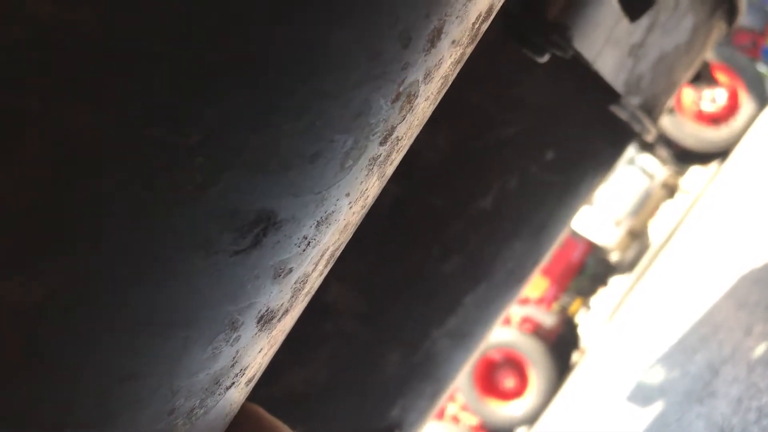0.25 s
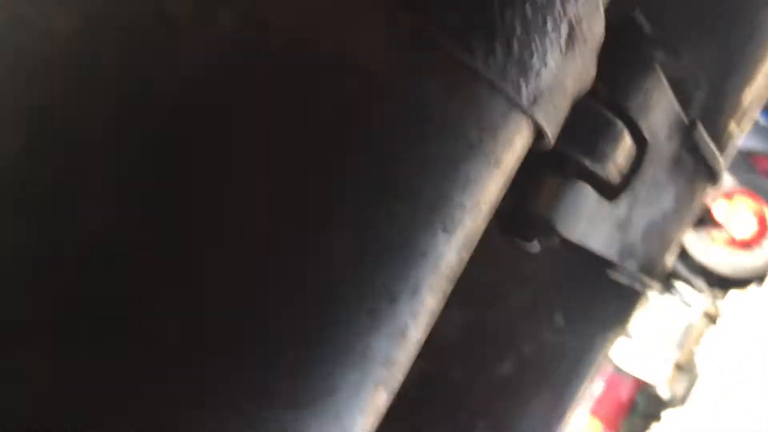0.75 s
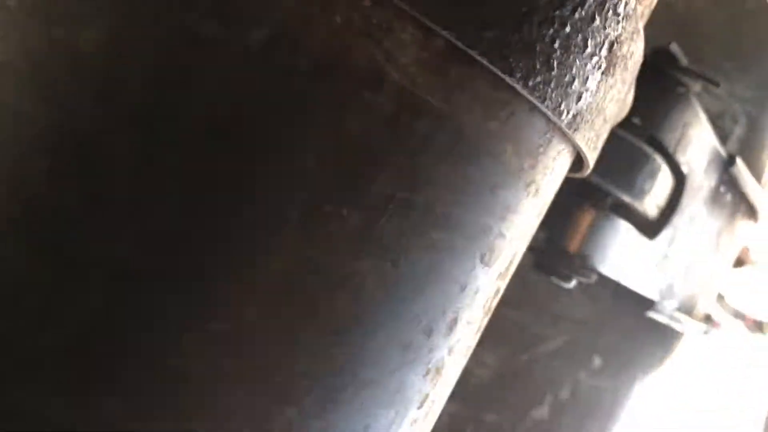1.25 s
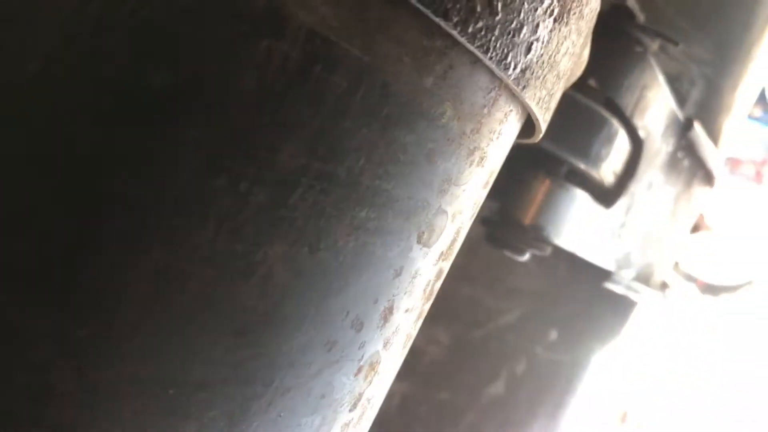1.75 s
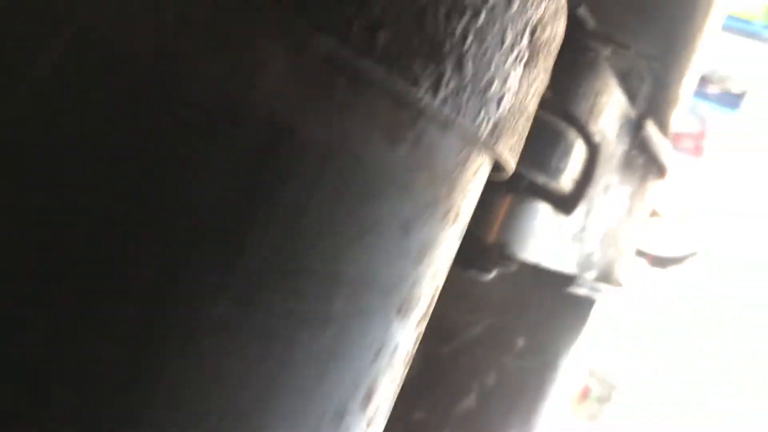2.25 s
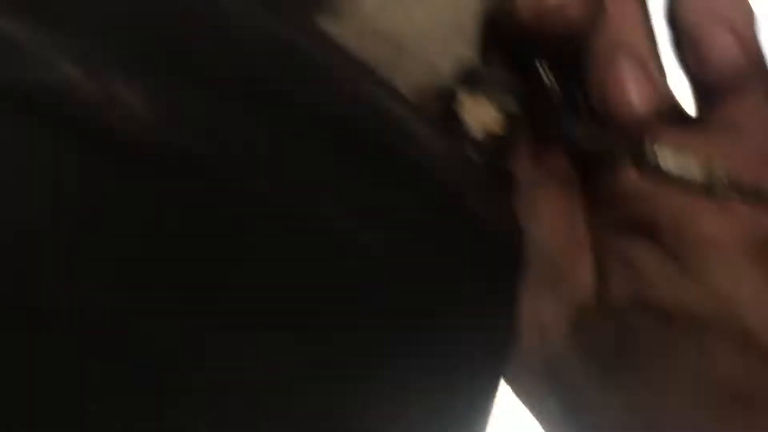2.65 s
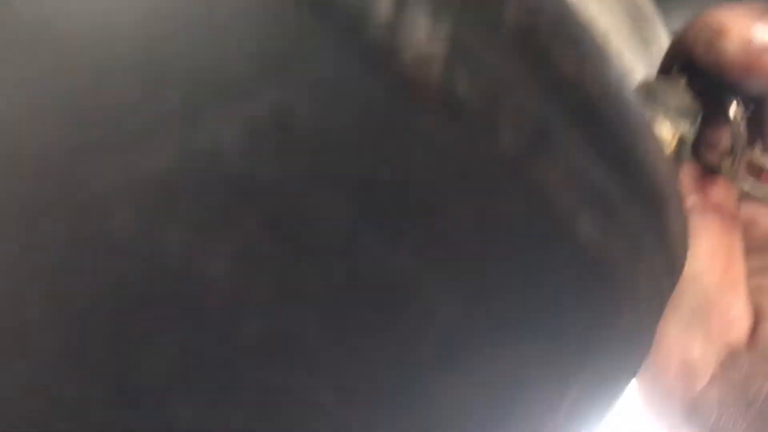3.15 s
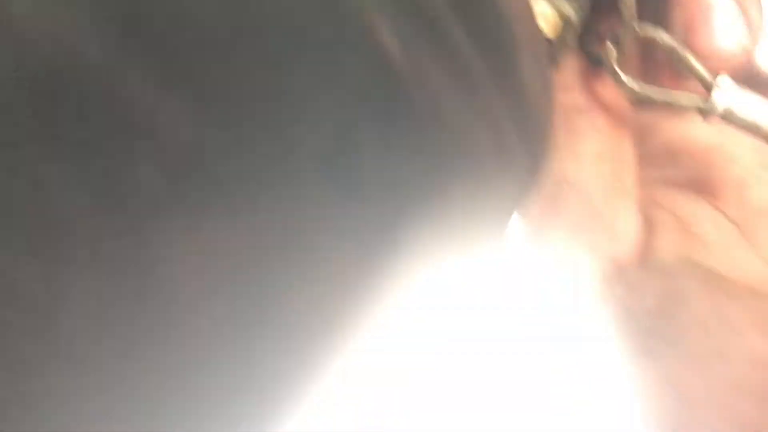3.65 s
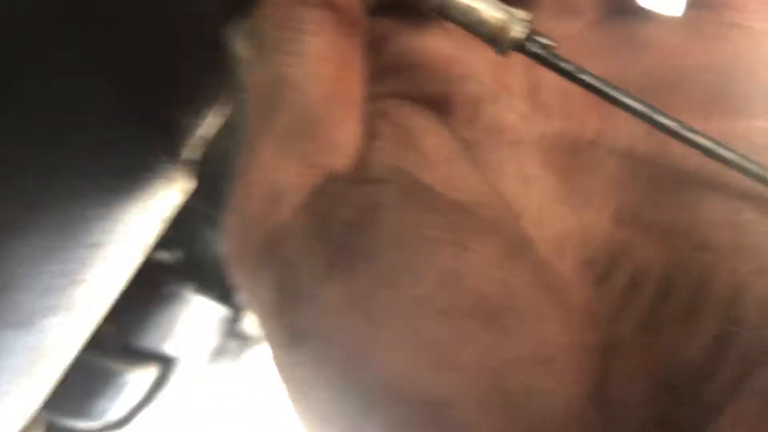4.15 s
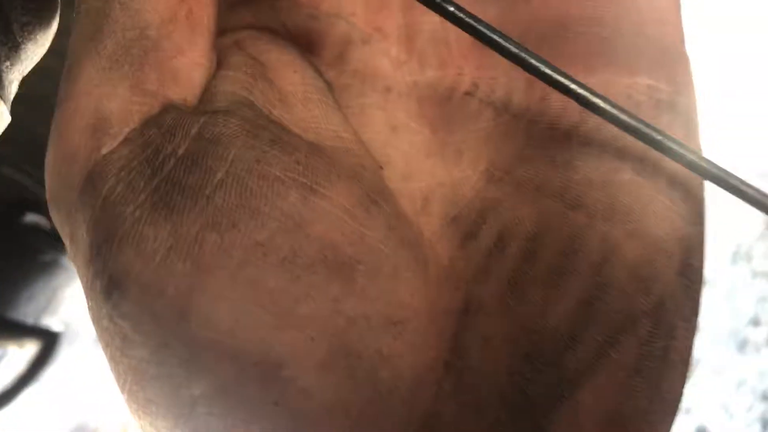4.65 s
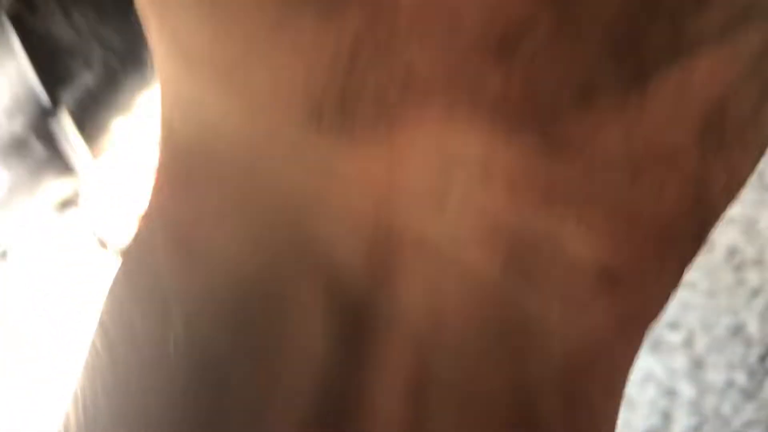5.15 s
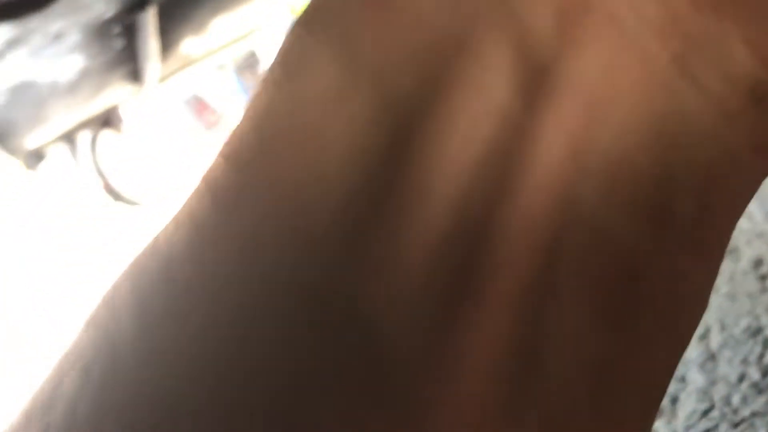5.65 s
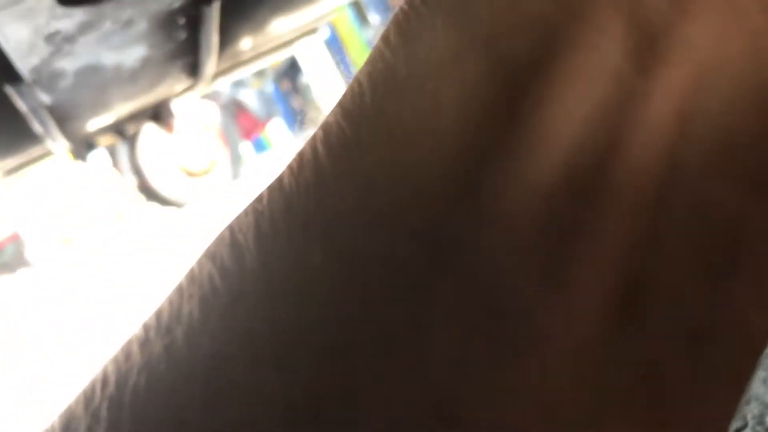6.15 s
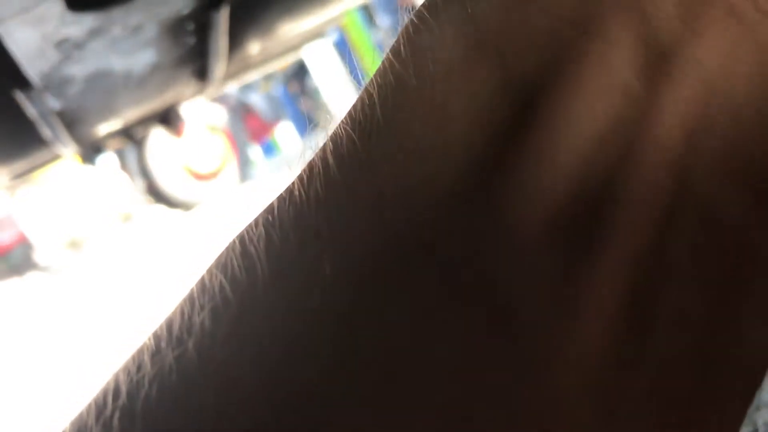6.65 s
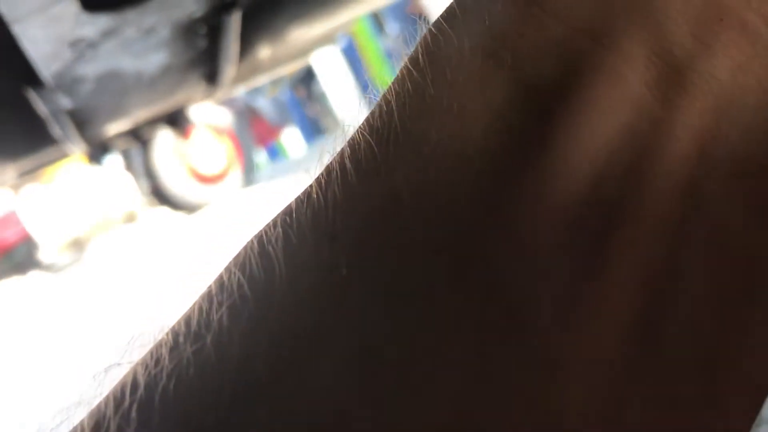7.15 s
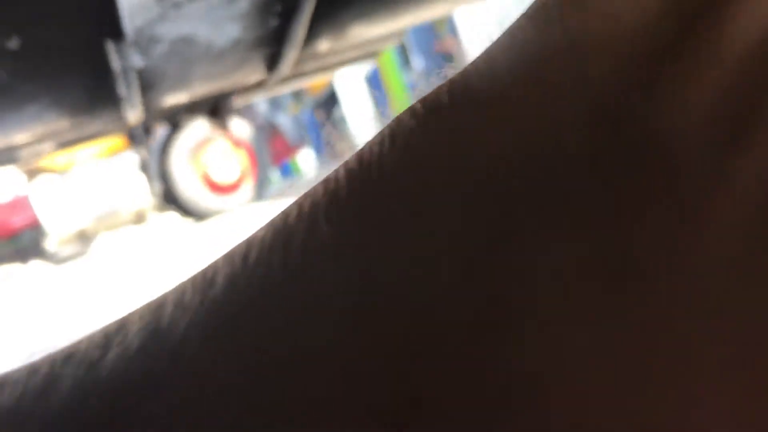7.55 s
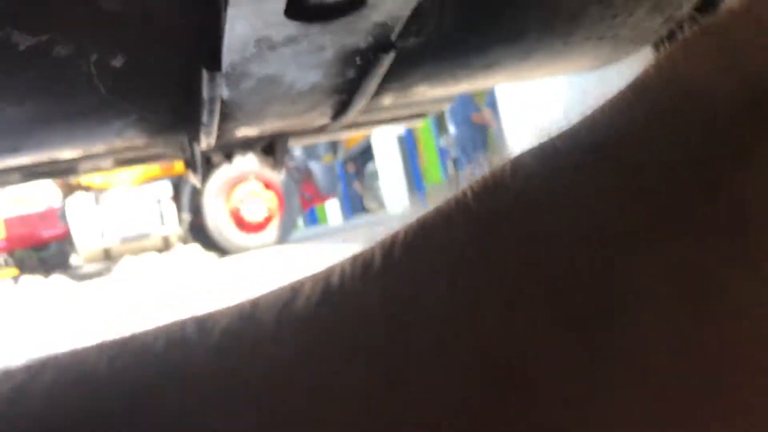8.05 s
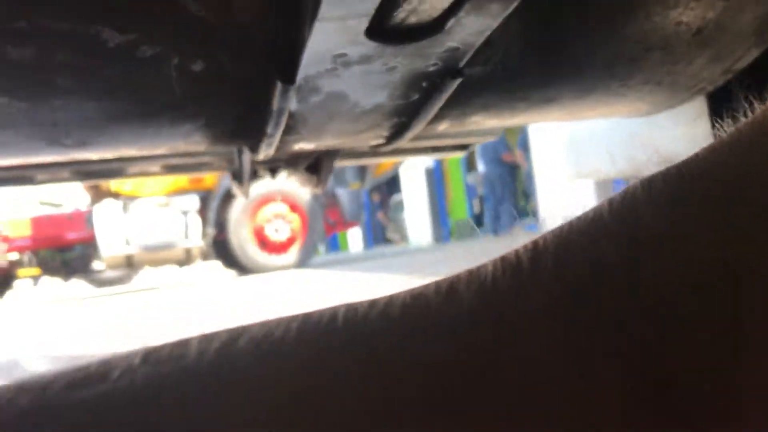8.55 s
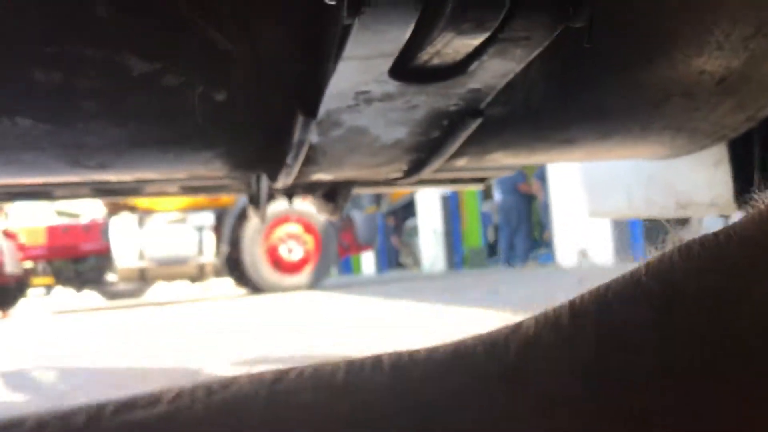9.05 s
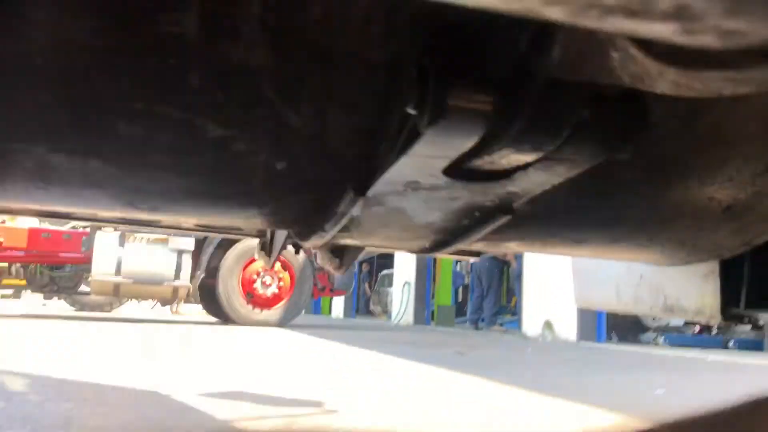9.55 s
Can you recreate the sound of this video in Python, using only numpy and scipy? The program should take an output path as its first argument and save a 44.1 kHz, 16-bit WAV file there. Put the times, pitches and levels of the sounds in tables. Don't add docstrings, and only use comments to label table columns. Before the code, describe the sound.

A truck air tank's drain valve blasts a bright steady hiss, pauses over a faint idling hum, hisses long again, then snaps shut.

```python
import sys
import numpy as np
from scipy import signal
from scipy.fft import rfft, irfft, next_fast_len
from scipy.io import wavfile
from scipy.ndimage import uniform_filter1d, map_coordinates

SR = 44100
rng = np.random.default_rng(int(sys.argv[2]) if len(sys.argv) > 2 else 0)


def wav_record(signal):
    frames = np.transpose(np.atleast_2d(signal))
    bounded = np.clip(frames, -1, 1)
    quanta = np.round(bounded * 32767).astype(np.int16)
    wavfile.write(sys.argv[1], SR, quanta)


def volts_from_db(level):
    exponent = np.asarray(level, float) / 20
    return 10 ** exponent


N = 431722

TOP_HZ = 15750


def unit(x):
    return x / np.sqrt(np.mean(x ** 2) + 1e-20)


def along(points, hz):
    f, v = np.transpose(points)
    return np.interp(np.log(hz + 1), np.log(f + 1), v)


def curve(rows, t=None, shut=None):
    s, *cols = np.transpose(rows)
    t = np.arange(N) / SR if t is None else t
    return [np.interp(t, s, c, shut, shut) for c in cols]


def wobble(rate):
    steps = np.arange(0, N + 32, 32)
    knots = rng.standard_normal(int(N * rate / SR) + 4)
    smooth = map_coordinates(knots, [steps * rate / SR])
    return np.interp(np.arange(N), steps, smooth)


def noise(shape):
    hz, t, z = signal.stft(rng.standard_normal(N), SR, nperseg=1024, noverlap=768)
    return unit(signal.istft(z * shape(hz[:, None], t), SR, nperseg=1024, noverlap=768)[1][:N])


def streaks(hz, t, bins, frames):
    field = rng.standard_normal((len(hz), len(t)))
    field = uniform_filter1d(field, size=bins, axis=0)
    return unit(uniform_filter1d(field, size=frames, axis=1))


# frequency in Hz, spectrum level in dB per Hz.
JET_SPECTRUM = [(350, -28.5), (1000, -17), (1400, -14), (2000, -8.5), (3200, -10), (4600, -9), (6000, -8.5),
                (7400, -9), (9000, -3), (9900, -3), (10500, -8), (11200, -6), (13000, -1.1147), (15600, -1)]
# time in seconds, jet level in dB, tilt from bass to treble in dB, mid bulge in dB.
CORD_PULL = [(0, -21.5, -0.5, -2), (.38, -23, -3, -3), (1.9, -21, -2, -2.5), (2.05, -20.5, -0.5, -1.5),
             (2.15, -23, -0.5, -3.5), (2.67, -21, 1, -2.5), (2.92, -23, -0.5, 9.5), (3.07, -23, 0.5, -1),
             (3.38, -24.5, 0.5, -0.5), (3.63, -21.5, -.5, -1), (4.04, -26.5, -2.5, 4), (4.12, -23, -1, 3.5),
             (5.07, -22, -1.5, 0), (5.5, -21, 2, -1.5), (6.2, -21, 1.6, -3.5), (7.4, -22, 1.5, -2.5),
             (8.4, -23, 1.46, 3.5), (9.55, -21.5, -0.5, -0.5)]
SPIT_DB, BLAST_SPIT_DB = .7, 1.1
THROAT_DB, FIRST_THROAT_DB = -0.06, -3
BLAST_DB, BLAST_THROAT_DB = 1.5, 1.5


def jet(patchy_db=1.1):
    def shape(hz, t):
        _, tilt_db, bulge_db = curve(CORD_PULL, t)
        place = np.clip(hz / 8000 - 1, -1, 1)
        colour_db = along(JET_SPECTRUM, hz) + tilt_db * place + bulge_db * (1 - place ** 2)
        patches_db = patchy_db * (1 + np.exp(-(hz / 5000) ** 2)) * streaks(hz, t, 3, 90)
        gain = volts_from_db(colour_db + patches_db)
        wide_rush = blast(t / 2 + BLAST_S / 2)
        second_db = THROAT_DB + BLAST_THROAT_DB * wide_rush
        throat_db = np.where(t < CRACK_STEPS[0][0], FIRST_THROAT_DB, second_db)
        gain = gain * volts_from_db(throat_db * np.exp(-np.log((hz + 1) / 1800) ** 2 / 0.21))
        gain = gain * (hz < TOP_HZ) * reflections(hz, t)
        return gain / np.sqrt(np.mean(abs(gain) ** 2, axis=0))
    rush = blast(np.arange(N) / SR)
    spit_db = (SPIT_DB + BLAST_SPIT_DB * rush) * wobble(300)
    level_db = curve(CORD_PULL)[0] + BLAST_DB * rush + 0.473 * wobble(15) + spit_db
    return valve() * volts_from_db(level_db) * noise(shape)


# start of the fall in seconds, time to lose 10 dB in seconds, steepening power.
VALVE_SHUTS = [
    (.374, .063, 3.3),
    (9.553, .006, .62),
]
# time in seconds, level relative to the full jet in dB.
CRACK_STEPS = [
    (1.786, -39),
    (1.79, -23),
    (1.812, -4.5),
    (1.83, -9.5),
    (1.846, -9),
    (1.876, 0),
]


def valve():
    t = np.arange(N) / SR
    first_db, last_db = (-10 * (np.clip(t - s, 0, 1) / fall_s) ** power for s, fall_s, power in VALVE_SHUTS)
    second_db = np.where(t < CRACK_STEPS[0][0], -200, curve(CRACK_STEPS)[0]) + last_db
    return volts_from_db(np.maximum(first_db, second_db))


BLAST_S, BLAST_WIDTH_S = 2.02, .07


def blast(t):
    return np.exp(-((t - BLAST_S) / BLAST_WIDTH_S) ** 2)


# time in seconds, extra path in mm, reflected share.
GROUND_ECHO = [(4.55, 381, .08), (4.85, 382, .19), (5.05, 372, .15), (5.25, 348, .14), (5.65, 328, .27),
               (5.95, 318, .23), (6.25, 314, .27), (7.35, 313, .22), (7.55, 296, .2), (7.75, 285, .23),
               (8.35, 276, .32), (8.55, 264, .22), (8.8, 259, .08), (9.5, 265, .13)]
# start and end in seconds, path as a ratio of the ground path, share (negative is inverted).
GROUND_FOLLOWERS = [(4.7, 6.4, 1.09, -.11), (5.4, 5.75, .655, .13), (5.95, 7.5, .615, .17),
                    (5.95, 7.35, .84, -.12), (6.05, 7.45, .805, .13), (7.55, 7.8, .86, .15),
                    (6.35, 7.15, 1.25, .09), (5.25, 5.75, .535, -.18), (5.9, 7.4, .5, -.1),
                    (6, 7.4, 1.15, -.08), (5.6, 7.4, 1.94, .07), (6.6, 7.4, 1.85, -.08),
                    (6.85, 7.4, .72, -.08), (7.75, 8.45, 1.45, -.13), (7.9, 8.15, .86, -.1),
                    (7.9, 8.15, .66, -.12), (7.95, 8.45, 1.92, .1), (8.65, 9.1, 2.07, .08),
                    (8.65, 9.5, 1.58, -.09)]
# start and end in seconds, extra path at start and at end in mm, share.
ARM_AND_TANK = [(0, .4, 34, 36, -.37), (0, .4, 93, 97, .17), (0, .4, 70, 71, -.2), (1.85, 2.6, 59, 57, .24),
                (1.85, 2.45, 76, 76, -.21), (2.45, 2.65, 50, 48, -.21), (2.75, 2.95, 70, 74, -.18),
                (2.9, 3.95, 33, 40, -.22), (2.95, 3.45, 127, 131, -.22), (2.75, 3.45, 294, 299, .08),
                (3.05, 3.75, 90, 86, .17), (3.65, 4.15, 106, 82, -.21), (4.25, 5.1, 79, 73, -.24),
                (3.75, 4.25, 69, 63, .18), (4.35, 5.1, 61, 53, .34), (4.25, 5.05, 119, 112, .11),
                (4.7, 5.05, 29, 31, -.16), (5.25, 7.45, 43, 41, .11), (5.8, 7.75, 126, 128, .2),
                (7.75, 8.45, 61, 61, -.17), (7.85, 8.35, 110, 106, -.22), (0, .4, 125, 125, -.1),
                (8.45, 9.1, 136, 143, -.06), (8.9, 9.45, 46, 43, .2)]
# start and end in seconds, extra path at start and at end in mm, share.
FRAME_AND_AXLE = [(0, .4, 483, 488, -.12), (0, .4, 189, 189, .22), (1.85, 2.35, 192, 165, .16),
                  (2.8, 3.45, 532, 522, -.1), (1.95, 2.95, 419, 426, .09), (2.75, 3.05, 161, 160, -.22),
                  (2.65, 3.35, 250, 248, .15), (3.45, 4.05, 262, 255, .11), (3.3, 4.65, 244, 237, .12),
                  (3.05, 3.45, 218, 211, -.12), (3.65, 4.45, 435, 395, .1), (1.87, 2.15, 341, 341, .11),
                  (4.25, 5.05, 304, 291, .1), (4.45, 5.25, 214, 207, -.11), (7.85, 8.55, 170, 166, -.29),
                  (8.75, 9.5, 183, 183, -.21), (7.95, 9.5, 208, 203, -.17), (8.3, 9.5, 735, 722, -.08),
                  (8.35, 8.55, 334, 326, .15), (8.55, 9.5, 582, 585, -.14), (8.65, 9.25, 360, 349, -.09),
                  (8.65, 9.45, 388, 396, -.09), (8.65, 9.45, 702, 704, -.09), (8.6, 9.5, 457, 457, .08)]


def reflections(hz, t):
    count, t = len(t), t[1::3]
    total = np.ones((len(hz), len(t)), complex)
    dull = 1.22 * np.exp(-(hz / 14000) ** 2 / 2)
    ground_mm, ground_share = curve(GROUND_ECHO, t)
    echoes = [(GROUND_ECHO[0][0], GROUND_ECHO[-1][0], ground_mm, ground_share)]
    for start, end, ratio, share in GROUND_FOLLOWERS:
        echoes.append((start, end, ratio * ground_mm, share + 0 * t))
    for start, end, first_mm, last_mm, share in ARM_AND_TANK + FRAME_AND_AXLE:
        path_mm = np.interp(t, [start, end], [first_mm, last_mm])
        echoes.append((start, end, path_mm, share + 0 * t))
    for start, end, path_mm, share in echoes:
        seen = np.clip(np.minimum(t - start, end - t) / .14 + 1, 0, 1)
        on = seen > 0
        delay = path_mm[on] / 343e3
        total[:, on] += share[on] * seen[on] * dull * np.exp(-2j * np.pi * hz * delay)
    return total[:, np.minimum(np.arange(count) // 3, len(t) - 1)]


# frequency in Hz, time to decay by 60 dB in seconds.
UNDERSIDE_DECAY = [(1000, 0.23), (5000, 0.23), (15000, 0.084)]


def underside(x):
    hz, t, z = signal.stft(rng.standard_normal(SR // 3), SR, nperseg=256)
    decay = volts_from_db(-60 * t / along(UNDERSIDE_DECAY, hz)[:, None])
    tail = signal.istft(z * decay, SR, nperseg=256)[1]
    return signal.fftconvolve(x, tail / np.linalg.norm(tail))[:N]


# time in seconds, level in dB.
SEEP_LEVEL = [
    (1.48, -92.5),
    (1.53, -72.5),
    (1.65, -69.5),
    (1.79, -68),
    (1.82, -90),
]


def seep():
    def two_bands(hz, t):
        lower = 1 / (1 + ((hz - 14300) / 400) ** 4)
        upper = .6 / (1 + ((hz - 15400) / 300) ** 4)
        return lower + upper
    return volts_from_db(curve(SEEP_LEVEL, shut=-200)[0] + 3 * wobble(25)) * noise(two_bands)


# time in seconds, peak in dB, colour in Hz, time to decay by 60 dB in seconds.
VALVE_TICKS = [
    (1.304, -36, 5430, 0.064),
    (1.304, -35.5, 1800, 0.099),
    (1.446, -62.5, 12000, .01),
]
# time in seconds, peak in dB, frequency in Hz, length in cycles.
FINGER_BUMPS = [
    (1.479, -20.5, 185, 2),
    (3.63, -36, 110, 2),
    (.785, -28, 90, 1.5),
]


def handling():
    out, t = np.zeros(N + SR), np.arange(SR // 5) / SR
    hz = np.fft.rfftfreq(len(t), 1 / SR)
    for s, db, colour_hz, t60 in VALVE_TICKS:
        resonance = 1 / (1 + ((hz - colour_hz) / 1500) ** 2)
        burst = unit(irfft(rfft(rng.standard_normal(len(t))) * resonance, len(t)))
        crack = 0.45 * volts_from_db(-60 * t / 0.0037) * rng.standard_normal(len(t))
        out[round(s * SR):][:len(t)] += volts_from_db(db) * (volts_from_db(-60 * t / t60) * burst + crack)
    for s, db, push_hz, cycles in FINGER_BUMPS:
        life = np.clip(t * push_hz / cycles, 0, 1)
        out[round(s * SR):][:len(t)] += volts_from_db(db) * np.sin(np.pi * life) * np.sin(2 * np.pi * push_hz * t)
    return out[:N]


# time in seconds, level in dB.
YARD_LEVEL = [(0, -44.5), (2.2, -45), (2.75, -49), (3.5, -47), (7.7, -46.5), (9, -42.5), (9.79, -42)]
# frequency in Hz, spectrum level in dB per Hz.
RUMBLE_SPECTRUM = [(30, -34.5), (45, -3.5), (120, -14), (230, -13), (400, -13.5), (480, -18.5),
                   (1500, -27.5), (2100, -33), (3800, -39.5), (5000, -49.5), (7500, -54.5), (10500, -57),
                   (12000, -55.5), (15700, -52)]
# multiple of the firing rate, level in dB.
ENGINE_ORDERS = [(1, -6), (2, -4), (3, 0), (4, 2), (5, -7.5), (6, -11.5), (7, -6.5), (8, -9.5), (9, -23.5),
                 (10, -26)]
FIRING_HZ = 49.45


def yard(tone_db=-3, rumble_db=-2):
    turns = np.cumsum(FIRING_HZ + 0.09813 * wobble(2)) / SR
    tones = np.zeros(N)
    for k, db in ENGINE_ORDERS:
        tones += volts_from_db(db + 1.5 * wobble(6)) * np.sin(2 * np.pi * (k * turns + k * k / 4))

    def rumble_shape(hz, t):
        mottle_db = np.clip(hz / 4000, .6, 1.8) * streaks(hz, t, 16, 20)
        return volts_from_db(along(RUMBLE_SPECTRUM, hz) + mottle_db)
    rumble = volts_from_db(rumble_db + .8 * wobble(9)) * noise(rumble_shape)
    return volts_from_db(curve(YARD_LEVEL)[0] + gain_lift_db()) * (volts_from_db(tone_db) * unit(tones) + rumble)


# start in seconds, time the jet pulls it down in seconds, lift in dB.
GAIN_RELEASES = [
    (.4, 1.847, 10),
    (9.67, 10, 14),
]
GAIN_RISE_S, GAIN_FALL_S = .2, .27


def gain_lift_db():
    t = np.arange(N) / SR
    lift_db = np.zeros(N)
    for up, down, db in GAIN_RELEASES:
        rise, fall = (t - up) / GAIN_RISE_S, 1 - (t - down) / GAIN_FALL_S
        lift_db += db * np.clip(np.minimum(rise, fall), 0, 1)
    return lift_db


# start in seconds, lower and upper edge in Hz.
SIDE_BANDS = [(0.276, 5000, 9400), (2.343, 9000, 10200), (2.411, 6700, 14100), (2.947, 7600, 8900),
              (3.461, 4800, 6200), (4.017, 5700, 12400), (4.386, 4400, 10900), (4.456, 6300, 10300),
              (4.689, 10400, 11600), (4.735, 5300, 10100), (4.781, 9200, 14400), (5.131, 4400, 11600),
              (5.407, 7100, 10300), (5.712, 4400, 8900), (5.895, 7900, 15700), (6.197, 4700, 13800),
              (7.73, 9000, 12300), (9.008, 4400, 8200), (9.054, 4800, 6200)]
FILL_S, FILL_DB = 0.0419, -42.5


def noise_fill():
    side, size = np.zeros(N), round(FILL_S * SR)
    hz = np.fft.rfftfreq(size, 1 / SR)
    window = np.sin(np.pi * np.arange(size) / size)
    for s, from_hz, to_hz in SIDE_BANDS:
        band = irfft(rfft(rng.standard_normal(size)) * (hz > from_hz) * (hz < to_hz), size)
        width = np.sqrt((to_hz - from_hz) / 1000)
        side[round(s * SR):][:size] += volts_from_db(FILL_DB) * width * unit(band * window)
    return np.array([side, -side])


def scene():
    near = jet() + handling()
    mono = near + volts_from_db(-20.5) * underside(near) + seep() + yard()
    return np.array([mono, mono])


def top_cut(x):
    return signal.sosfilt(signal.butter(12, 17100, fs=SR, output="sos"), x)


def record(dry):
    size = next_fast_len(N + 8192)
    hz = np.fft.rfftfreq(size, 1 / SR)
    low_pass = np.clip((TOP_HZ - hz) / 120 + .5, 0, 1)
    passband = low_pass / (1 + (40 / (hz + 1)) ** 8)
    mix = irfft(rfft(dry + noise_fill(), size) * passband, size)[:, :N]
    return top_cut(mix)


dry = scene()
out = record(dry)
wav_record(out)
```